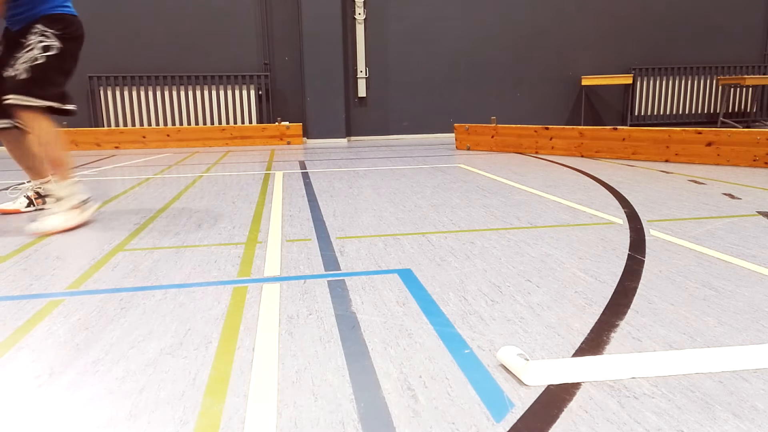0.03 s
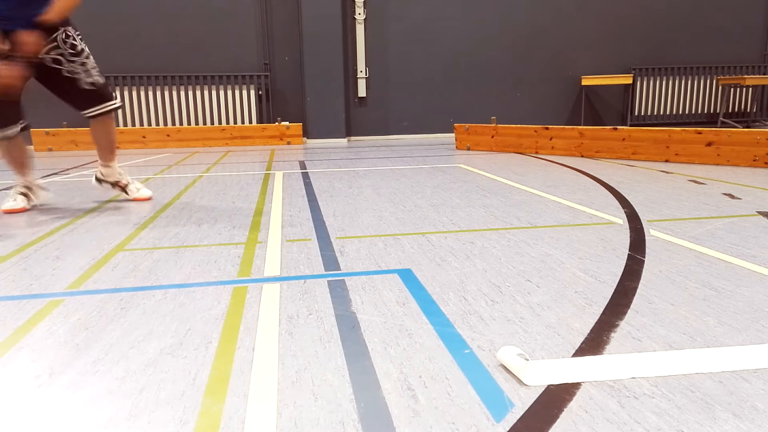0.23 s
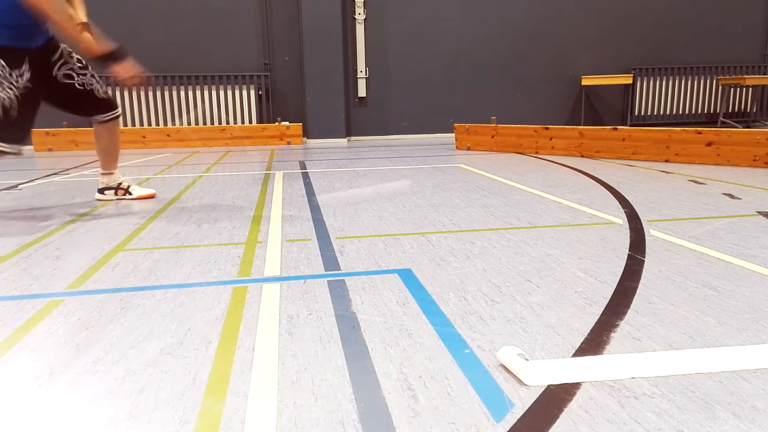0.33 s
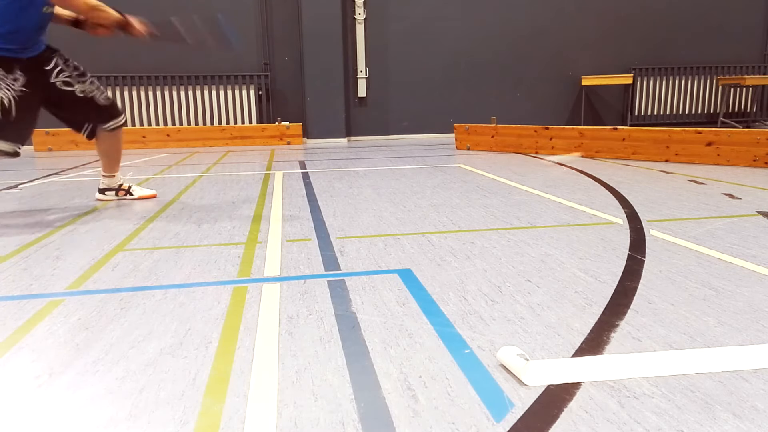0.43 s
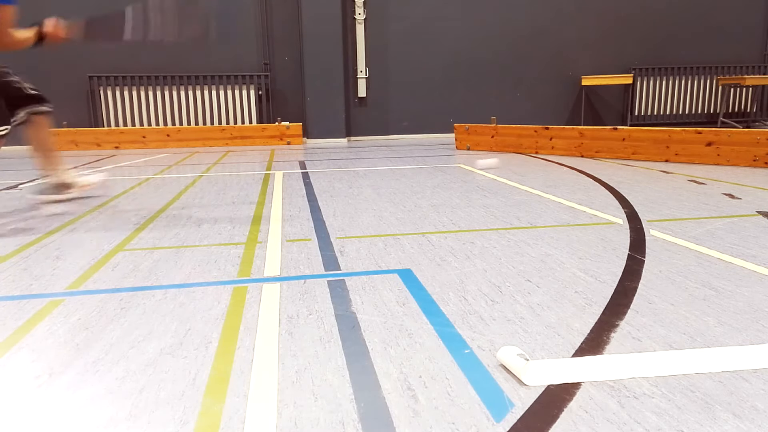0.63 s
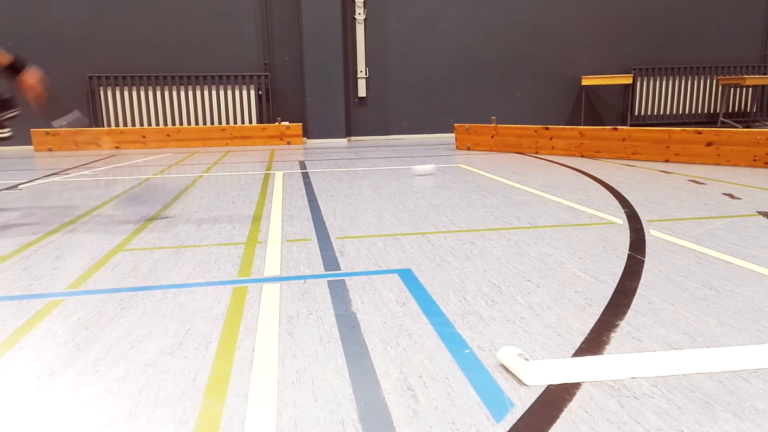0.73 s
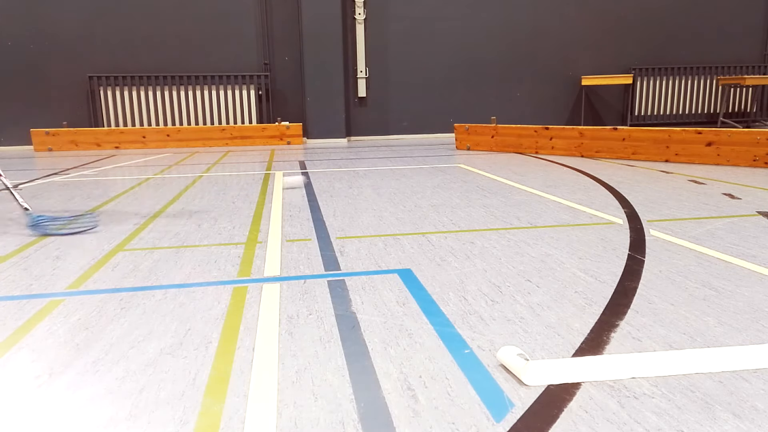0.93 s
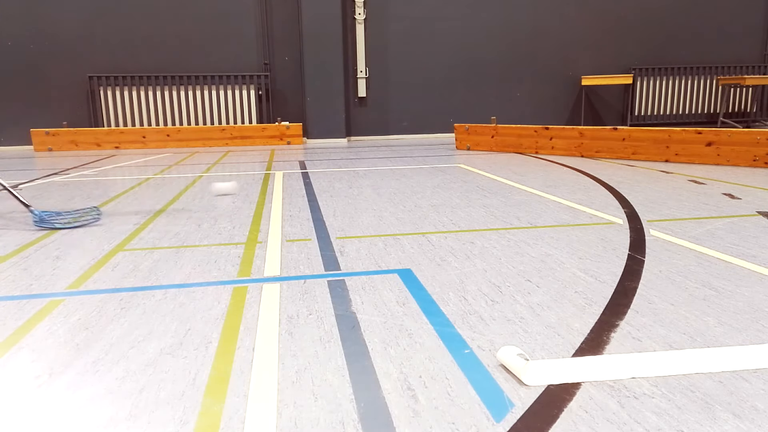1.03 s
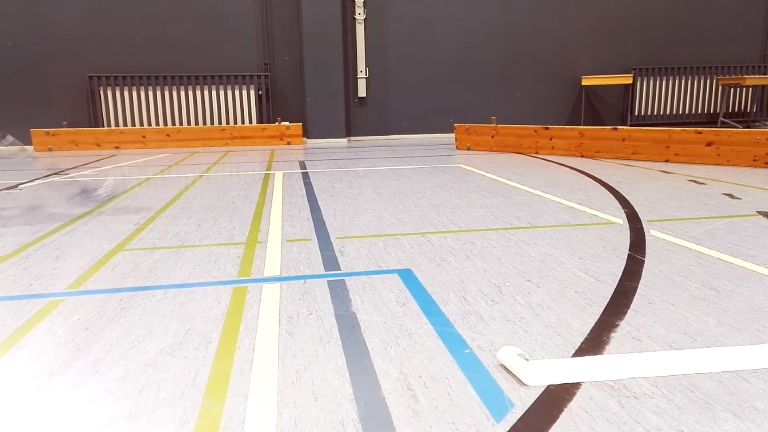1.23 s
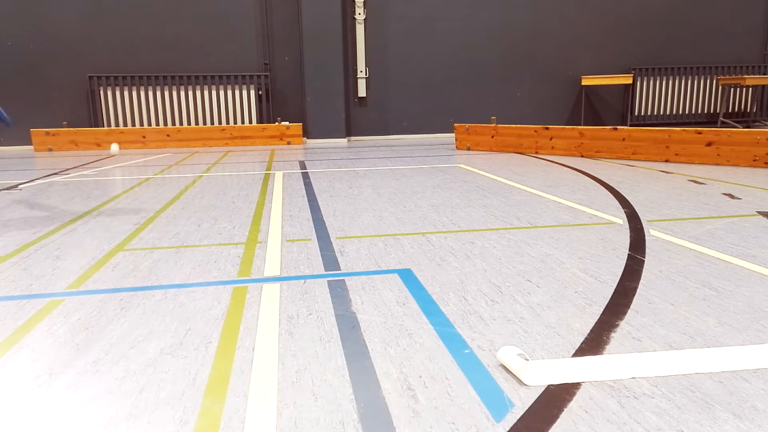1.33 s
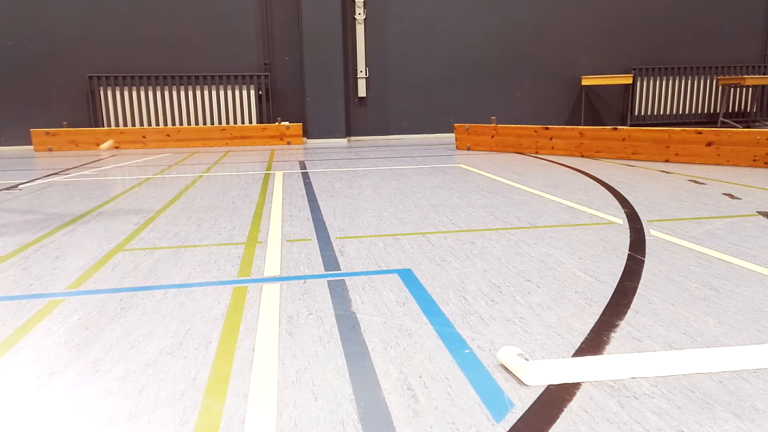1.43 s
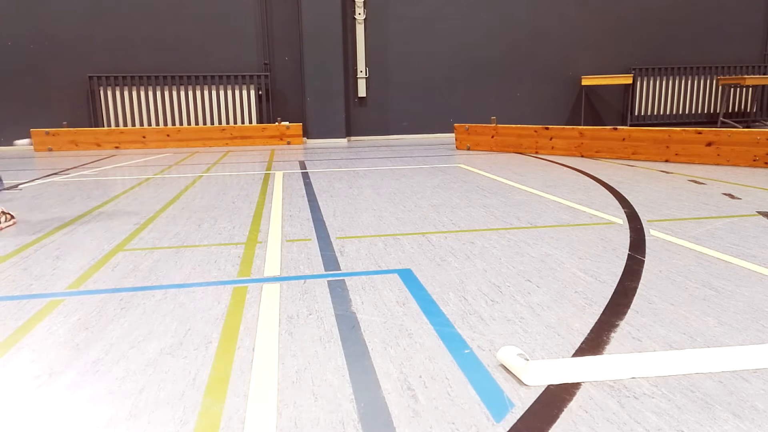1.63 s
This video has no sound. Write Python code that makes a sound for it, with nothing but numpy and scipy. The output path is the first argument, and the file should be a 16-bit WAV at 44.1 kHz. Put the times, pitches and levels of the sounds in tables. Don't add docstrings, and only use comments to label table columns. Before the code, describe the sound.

A hollow plastic ball lands hard on a wooden bench, bounces back with clicks, is shot again with a very loud crack, and hits the wood more softly; shoes squeak in a reverberant sports hall, microphones on the floor.

```python
import sys
import numpy as np
from scipy import signal
from scipy.fft import rfft, irfft
from scipy.io import wavfile
from scipy.ndimage import uniform_filter1d

SR = 44100
rng = np.random.default_rng(int(sys.argv[2]) if len(sys.argv) > 2 else 0)


def pcm_store(signal):
    levels = np.round(np.clip(np.atleast_2d(signal), -1, 1) * 32767)
    wavfile.write(sys.argv[1], SR, levels.astype(np.int16).T)


def boost(x):
    u = np.asarray(x, float) / 20
    return 10 ** u


N = 74970


def evened(x):
    return x / np.sqrt(np.mean(x ** 2) + 1e-20)


def read(points, hz):
    f, value = np.transpose(points)
    return np.interp(np.log(hz + 1), np.log(f + 1), value)


def add(mix, s, sound, lag_ms):
    shadow_db_per_ms = 5
    size = len(sound) + 128
    at = int(s * SR) - 32
    hz = np.fft.rfftfreq(size, 1 / SR)
    lag = np.array([[lag_ms], [-lag_ms]])
    late_s = s - at / SR + lag / 2000
    delayed = irfft(rfft(sound, size) * np.exp(-2j * np.pi * hz * late_s), size)
    part = mix[:, at:at + size]
    part += boost(-shadow_db_per_ms * lag) * delayed[:, :part.shape[1]]


# (f/Hz, t60/s)
HALL_T60 = [(120, 2.9), (330, 2.69), (870, 1.96), (2300, 1.59), (5000, 1.2), (8000, 0.79), (13000, 0.41)]


def diffuse(seconds, tone, decays):
    spacing_m, sound_m_per_s = 0.2, 343
    length = int(seconds * SR)
    frames, hz = length // 128 + 5, np.fft.rfftfreq(512, 1 / SR)
    a, b, c, d = rng.standard_normal((frames, 257, 4)).T
    same = np.sinc(2 * hz * spacing_m / sound_m_per_s)[:, None]
    left = a + 1j * b
    right = same * left + np.sqrt(1 - same ** 2) * (c + 1j * d)
    fall_db = -60 * np.arange(frames) * 128 / SR / read(HALL_T60, hz)[:, None]
    bands = np.array([left, right]) * boost(decays * fall_db)
    noise = signal.istft(bands, nperseg=512, noverlap=384)[1][:, :length]
    fine_hz = np.fft.rfftfreq(noise.shape[1], 1 / SR)
    return irfft(rfft(noise) * boost(read(tone, fine_hz)), noise.shape[1])


# (f/Hz, level/dB)
EARLIER_TONE = [(60, 14), (200, -7.5), (420, 3), (900, -2), (2000, -18.5), (4500, -13.5), (9000, -10.5),
                (14000, -7.5)]
# (f/Hz, level/dB)
AIR_TONE = [(20, 30), (60, 21), (200, 20.5), (400, -19), (1300, 10.5), (4000, -3.5), (11000, -7),
            (15000, -11)]


def background():
    earlier_db, air_db = -42, -52
    earlier = diffuse(2, EARLIER_TONE, 0.46)[:, :N]
    air = diffuse(1.8, AIR_TONE, 0)[:, :N]
    return boost(earlier_db) * earlier / np.std(earlier[:, :SR // 10]) + boost(air_db) * evened(air)


# (f/Hz, level/dB)
HALL_TONE = [(100, 4), (1000, -0.5), (4000, -2.5), (7000, -8), (13000, 3.5)]
# (t/s, level/dB)
WALLS = [(.0012, -11), (.0055, -11), (0.018, -50), (.037, -24), (.085, -27.5), (0.154, -41)]


def hall(x, wet_db, walls=WALLS):
    tail = diffuse(1.4, HALL_TONE, 1)
    build_up_s = 0.01
    tail *= np.minimum(np.arange(tail.shape[1]) / SR / build_up_s, 1) ** 2
    tail *= boost(wet_db) / np.linalg.norm(tail[0])
    for s, db in walls:
        for channel in tail:
            at = int(s * SR) + rng.integers(0, 12)
            channel[at:at + 40] += boost(db) * evened(rng.standard_normal(40)) / np.sqrt(40)
    return x + signal.fftconvolve(x[:1], tail, axes=1)[:, :N]


# (start t/s, swell/s, release/s, top level/dB, swell depth/dB)
DRAGS = [
    (0.109, 0.092, 0.076, -37, -15),
    (0.434, 0.0046, 0.0044, -35.5, -11),
    (1.139, 0.024, 0.0092, -29.5, -26),
]
# (f/Hz, level/dB)
DRAG_TONE = [(500, 4.5), (3000, 0.5), (5000, -3.5), (7500, 11), (10500, 12.5), (14000, 8)]


def drags():
    grains_per_s, grain_db = 3200, 5
    out, t = np.zeros((2, N)), np.arange(SR // 4) / SR
    tone = boost(read(DRAG_TONE, np.fft.rfftfreq(len(t), 1 / SR)))
    for s, swell, release, db, depth_db in DRAGS:
        chance, size, sign = rng.random((3, len(t)))
        grit = (chance < grains_per_s / SR) * boost(-grain_db * np.log(size + 0.041)) * np.sign(sign - .5)
        grit = irfft(rfft(grit) * tone, len(t))
        shape = boost(db + depth_db * np.maximum(1 - t / swell, 0))
        shape *= np.clip((swell + release - t) / release, 0, 1)
        add(out, s, evened(grit) * shape * np.minimum(t / .005, 1), -.2)
    return out


# (t/s, level/dB, octave level/dB, f/Hz)
SQUEAKS = [
    (.1945, -37, 8, 5720),
    (.2487, -36, 4, 5620),
    (.4532, -14, -7, 5900),
]
SQUEAK_S = [.005, .009, .0098]
SQUEAK_LAG_MS = [-.16, -.18, -.07]


def squeaks():
    wobble_depth, rise_s, octave_fade_db = .007, .001, -10
    out = np.zeros((2, N))
    for (s, db, octave_db, hz), length, lag_ms in zip(SQUEAKS, SQUEAK_S, SQUEAK_LAG_MS):
        t = np.arange(0, length, 1 / SR)
        drift = evened(uniform_filter1d(rng.standard_normal(SR // 50), size=60))[:len(t)]
        phase = 2 * np.pi * np.cumsum(hz * (1 + wobble_depth * drift)) / SR
        shape = np.minimum(np.minimum(t, length - t) / rise_s, 1)
        octave = boost(octave_db + octave_fade_db * t / length) * np.cos(2 * phase)
        add(out, s, boost(db) * shape * (np.sin(phase) + octave), lag_ms)
    return out


def resonate(x, hz, width):
    r = np.exp(-np.pi * width / SR)
    return 2 * signal.lfilter([1 - r], [1, -r * np.exp(2j * np.pi * hz / SR)], x).real


# (multiple of shell pitch, width/Hz, level/dB)
SHELL = [(0.268, 888, 0), (.4, 1234, 7.5), (0.542, 900, 10.5), (.78, 3100, 20.5), (1, 1740, 24),
         (1.2, 1800, -17), (1.47, 1390, -12)]


def crack(bright_db, shell_hz):
    rise_s, burst_t60, snap_db = .0003, .007, 13
    scatter_db, scatter_t60 = -11, .02
    t = np.arange(2048) / SR
    fall = boost(-60 * t / burst_t60) + boost(scatter_db - 60 * t / scatter_t60)
    burst = rng.choice([-1., 1.], len(t)) * fall * np.minimum(t / rise_s, 1)
    burst[round(rise_s * SR)] = -boost(snap_db)
    out = np.zeros(len(t))
    for multiple, width, db in SHELL:
        gain = boost(db + bright_db * np.log2(multiple))
        out += gain * resonate(burst, multiple * shell_hz, width)
    return out / abs(out).max()


# (t/s, crack peak level/dB, ball ring level/dB, brightness/dB per octave, shell f/Hz)
CLICKS = [(.2090, -25, -9.5, 12, 11110), (0.214, -19, -18.5, 18, 9330), (.2255, -21, -17, 18, 11500),
          (.2360, -29, -4, -50, 10600), (0.338, -31, -24, 12, 11000), (0.3445, -26, -54, 8, 9500),
          (0.6973, -15.5, -5.5, -10, 11170), (0.7637, -39, -14, -13, 11000),
          (0.7919, -15.5, -14, 1.5, 10960), (1.0283, -38, -14, 10, 10800), (1.1298, -10, -11.5, 38, 9560),
          (1.1681, 1, -23, 7.5, 11020), (1.1824, -22, -13, -2.5, 11300), (1.393, -40, -11, -51, 10400),
          (1.4013, -33.5, -9, -1, 10200), (1.4174, -23, -4, -20.5, 9850), (1.537, -28, -10, -20.5, 8900),
          (1.6196, -23.5, -9, 41, 10160), (1.6300, -30.5, -14, -2, 9900)]
CLICK_LAG_MS = [-.22, -.2, .07, -.14, .07, .09, -.16, -.16, -.18, -.14, -.22, -.18, .11, 0, 0, 0, -.24,
                -.22, -.22]


def clicks():
    ring_per_shell, ring_t60, ring_gain_db = .085, 0.019, -2
    out, t = np.zeros((2, N)), np.arange(2048) / SR
    for (s, db, ring_db, bright_db, hz), lag_ms in zip(CLICKS, CLICK_LAG_MS):
        fall = boost(ring_db + ring_gain_db - 60 * t / ring_t60)
        ring = -fall * np.sin(2 * np.pi * ring_per_shell * hz * t)
        add(out, s, boost(db) * (crack(bright_db, hz) + ring), lag_ms)
    return out


# (t/s, blow level/dB, crack level/dB, brightness/dB per octave, contact/ms)
BENCH_HITS = [
    (0.4104, -9, -4, -19, 0.52),
    (1.3656, -25.5, -10, -11.5, 0.61),
]
BENCH_LAG_MS = [.12, -.18]
# (f/Hz, level/dB, t60/s)
FIRST_PLANK = [(161.5, -21.5, 0.18), (257, -19.5, 0.03), (321, -14, 0.058), (394, -17, 0.072),
               (480, -14, 0.043), (586, -21, 0.14), (681, -10.5, 0.053), (808, -15, 0.02),
               (1165, -7.5, 0.033), (1390, -2, 0.013), (1740, -3.5, 0.013), (2240, -0.5, 0.011),
               (2980, -38, 0.027), (3594, 19.5, .012)]
# (f/Hz, level/dB, t60/s)
SECOND_PLANK = [(186.9, -3.5, 0.056), (270.2, -10, 0.23), (318, -4, 0.042), (407, -6, 0.02),
                (541, 4.5, 0.023), (641.4, -4, 0.12), (860, -29, 0.024), (1270, 8.5, 0.01),
                (2110, -5.5, 0.044), (2950, -20, 0.019)]


def bench():
    out, t = np.zeros((2, N)), np.arange(SR // 3) / SR
    hits = zip(BENCH_HITS, BENCH_LAG_MS, (FIRST_PLANK, SECOND_PLANK))
    for (s, blow_db, crack_db, bright_db, contact_ms), lag_ms, plank in hits:
        blow = -np.sin(np.pi * np.minimum(1000 * t / contact_ms, 1)) ** 2
        modes = np.zeros(len(t))
        for hz, db, t60 in plank:
            modes += boost(db - 60 * t / t60) * np.cos(2 * np.pi * hz * t)
        sound = boost(blow_db) * signal.fftconvolve(blow / -blow.sum(), modes)[:len(t)]
        sound[:2048] += boost(crack_db) * crack(bright_db, shell_hz=10500)
        add(out, s, sound, lag_ms)
    return out


# (t/s, length/s, level/dB, f/Hz)
BOOMS = [
    (.61, 0.152, -35, 146.7),
    (1.53, 0.11, -41, 174.4),
]


def booms():
    out = np.zeros((2, N))
    for s, length, db, hz in BOOMS:
        t = np.arange(0, length, 1 / SR)
        add(out, s, boost(db) * np.sin(np.pi * t / length) * np.sin(2 * np.pi * hz * t), -.1)
    return out


def scene():
    soles = hall(drags() + squeaks(), wet_db=-12, walls=WALLS[2:])
    ball = hall(clicks(), wet_db=-8)
    wood = hall(bench(), wet_db=-4)
    return background() + soles + ball + wood + booms()


# (f/Hz, level/dB)
MIC_EDGE = [(14300, 0), (15000, -30), (16300, -36), (16650, -75)]


def microphones(dry):
    low_cut = signal.butter(3, 125, "high", fs=SR, output="sos")
    cut = signal.sosfilt(low_cut, dry) + boost(-5.5) * dry
    edge = boost(read(MIC_EDGE, np.fft.rfftfreq(N, 1 / SR)))
    return irfft(rfft(np.clip(cut, -.97, .97)) * edge, N)


def top_cut(x):
    return signal.sosfilt(signal.butter(12, 16470, fs=SR, output="sos"), x)


def record(dry):
    mix = microphones(dry)
    return top_cut(mix)


dry = scene()
out = record(dry)
pcm_store(out)
```